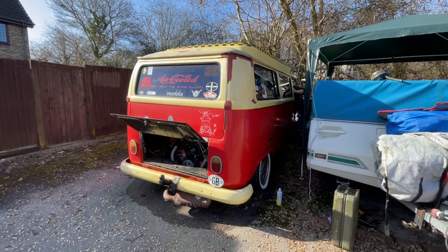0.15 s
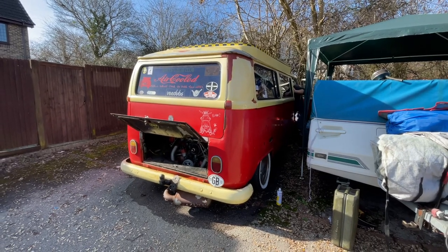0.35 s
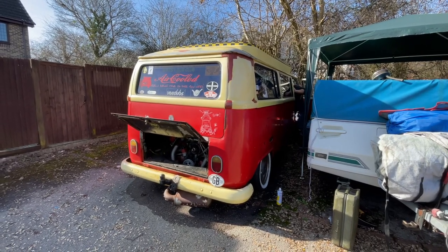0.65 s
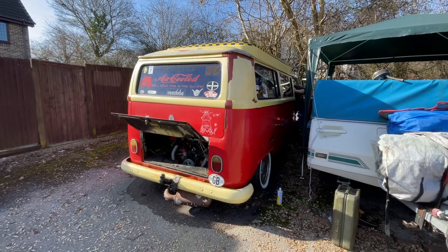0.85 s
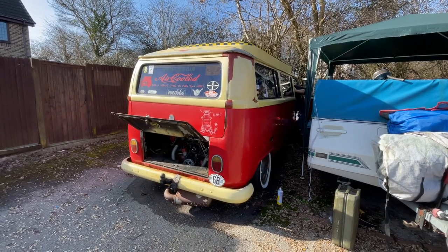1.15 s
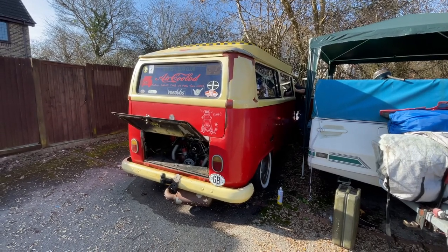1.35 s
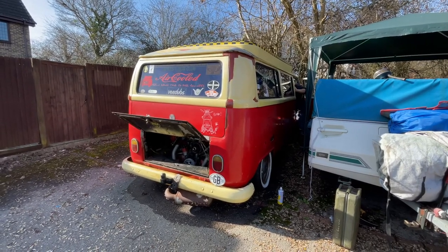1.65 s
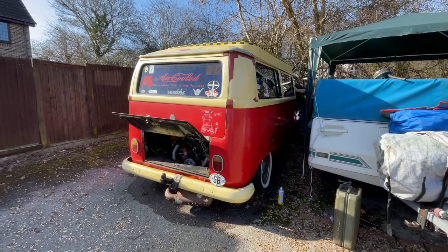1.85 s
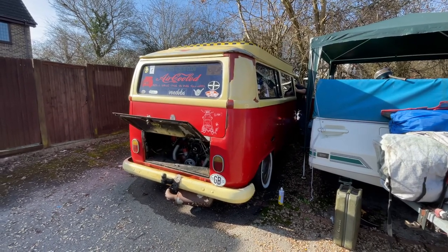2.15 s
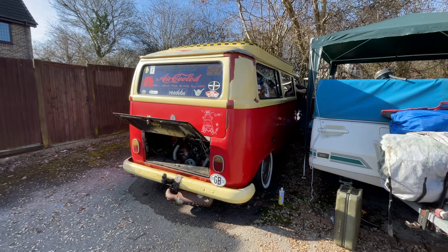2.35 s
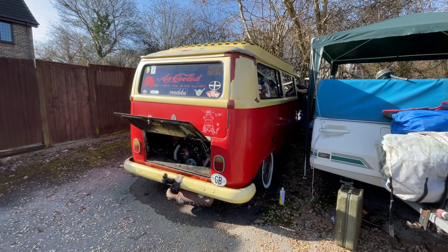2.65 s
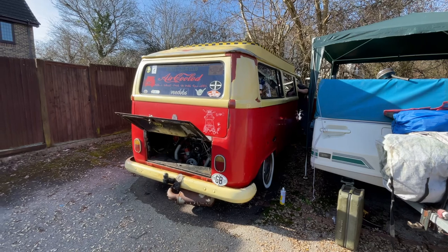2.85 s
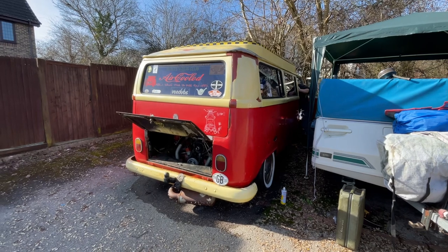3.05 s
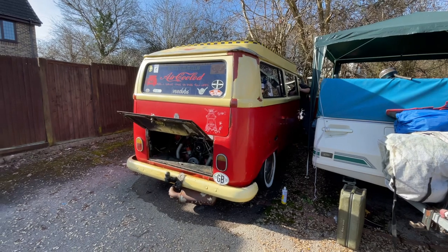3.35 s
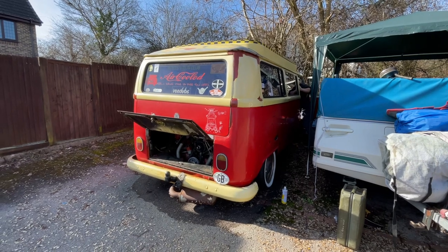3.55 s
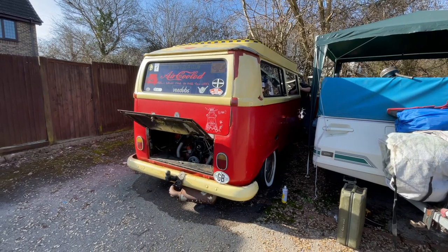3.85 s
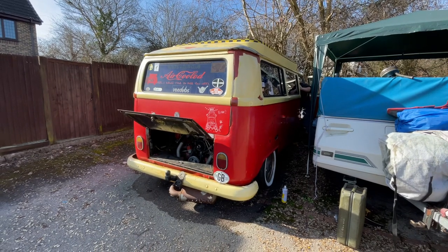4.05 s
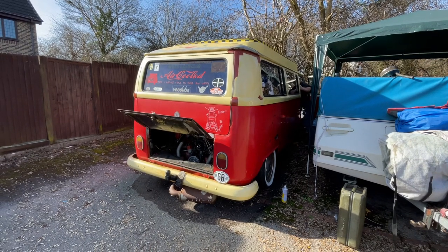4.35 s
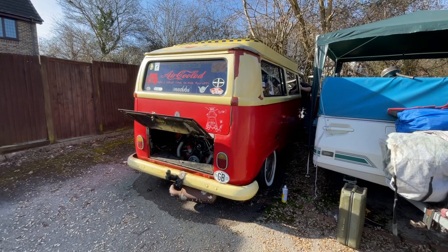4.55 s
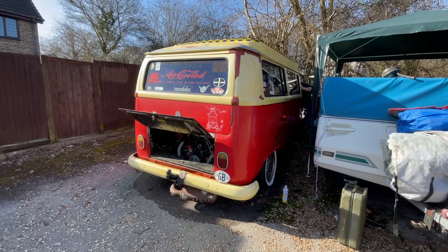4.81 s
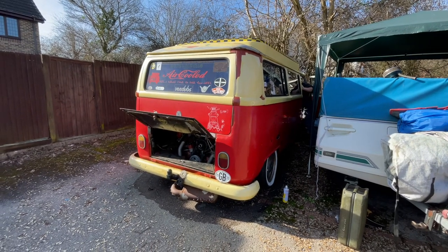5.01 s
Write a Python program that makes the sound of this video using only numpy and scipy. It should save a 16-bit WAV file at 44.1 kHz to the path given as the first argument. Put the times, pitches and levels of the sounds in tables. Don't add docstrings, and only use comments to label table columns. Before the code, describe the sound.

An open-air yard, picked up by a phone's stereo microphones near the back of an old van. From 0 to 2.4 seconds it is quiet: low far traffic rumble, a few thin wavering bird whistles in the first second and again around 2, and soft leaf and twig rustle, strongest near 0.9 and 1.5 to 2. From about 0.55 small keys tick, scrape and ring brightly, busiest between 0.65 and 1.3, with little knocks of the lock barrel, then sparser touches to 2.3. At 2.44 to 2.5 the starter engages with a very loud, hard metallic double clack and a brief hum. Cranking follows to the end at about 5 seconds: rough gear grind and rattle swelling and easing some seven times a second, ringing metal casing, irregular knocks and ticks, a low housing hum and soft deep exhaust puffs. Short echoes blur it. The engine never catches.

```python
import sys
import numpy as np
from scipy import signal
from scipy.fft import rfft, irfft, next_fast_len
from scipy.io import wavfile
from scipy.ndimage import uniform_filter1d

SR = 44100
rng = np.random.default_rng(int(sys.argv[2]) if len(sys.argv) > 2 else 0)


def rack_gain(trim_db):
    fader = np.asarray(trim_db, float)
    return 10 ** (fader / 20)


def pcm_store(signal):
    levels = np.round(np.clip(np.atleast_2d(signal), -1, 1) * 32767)
    wavfile.write(sys.argv[1], SR, levels.astype(np.int16).T)


N = 228349
T = np.arange(N) / SR

# time the piston tops out in seconds, valve snap in dB, loaded gear grind in dB,
# housing hum in dB, exhaust puff in dB.
STROKES = [(2.5438, -45.5, -39.5, -36.5, -38.5), (2.6759, -40.5, -36.5, -44.5, -30.5),
           (2.829, -38, -37.5, -38.5, -37), (2.977, -41, -37.5, -36, -34.5),
           (3.121, -40, -36.5, -35, -38.5), (3.26, -42.5, -37.5, -44, -37), (3.3919, -42, -37, -35.5, -38),
           (3.536, -41, -36.5, -34, -36), (3.6725, -41, -39, -37.5, -38), (3.813, -43, -33, -33, -37.5),
           (3.9464, -41.5, -38.5, -36.5, -36.5), (4.0907, -41.5, -36, -34, -37),
           (4.228, -41, -38, -35, -34), (4.3653, -42, -36, -35.5, -36), (4.5003, -42, -37.5, -34.5, -38),
           (4.6469, -41, -36.5, -36, -36.5), (4.7826, -42.5, -37, -36, -39),
           (4.9311, -41.5, -37, -36.5, -37), (5.0645, -41, -38, -38.5, -37)]
# pitch in Hz, width in Hz, lift in dB.
CASING = [(385.5, 8.2, 13.5), (470, 54, 6), (572, 16, -2.5), (660, 35, 3), (780, 43, 0.5), (1013, 57, 4.5),
          (1260, 8.9, 11.5), (1380, 34, 7.5), (1483, 81, 4.5), (1980, 60, 4), (2160, 260, 5.5),
          (2404, 26, -9), (2590, 150, 0.5), (2633, 41, 2.5), (3015, 47, 7.5), (3273, 42, 8),
          (3510, 39, 4.5), (5060, 170, -0.5), (5600, 820, 0)]


def evened(x):
    return x / np.sqrt(np.mean(x ** 2) + 1e-20)


def smooth_noise(count, size, passes=1):
    x = rng.standard_normal(count)
    for _ in range(passes):
        x = uniform_filter1d(x, size=size)
    return evened(x)


def read(points, hz):
    f, value = np.transpose(points)
    return np.interp(np.log(hz + 1), np.log(f + 1), value)


def add(mix, s, sound):
    part = mix[round(s * SR):][:len(sound)]
    part += sound[:len(part)]


def colour(x, points, rings=()):
    hz = abs(np.fft.fftfreq(16384, 1 / SR))
    db = read(points, hz)
    for f, width, lift in rings:
        db = db + lift / (1 + (2 * (hz - f) / width) ** 2)
    log_size = np.log(rack_gain(np.maximum(db, -100)))
    taps = np.fft.ifft(np.exp(np.conj(signal.hilbert(log_size)))).real[:4096]
    return signal.oaconvolve(x, taps / np.linalg.norm(taps))[:len(x)]


def swells(rows, t):
    return np.sqrt(sum(rack_gain(db) ** 2 * np.exp(-((t - s) / half) ** 2) for s, db, half in rows))


def stroke_db(share, start, rise, hold, decay, top_db, depth_db):
    def fall(v):
        return depth_db * (1 - np.exp(-np.maximum(v - rise - hold, 0) / decay))

    u = (share - start) % 1
    return top_db + fall(u) + fall(0.72) * np.maximum(1 - u / rise, 0)


def slam(touch_db, skid_db, seat_db, fall, drag_db):
    click_s, touch_s, seat_s = 2.405, 2.443, 2.468

    def blow(s, db, drop):
        early, late = np.maximum(s - T, 0), np.maximum(T - s, 0)
        return rack_gain(db - 1400 * early - drop * late) ** 2

    sliding = (T > click_s) * (T < touch_s)
    slide = rack_gain(-74.5 + 600 * np.clip(T - click_s, 0, 1)) ** 2 * sliding
    skid = rack_gain(skid_db) ** 2 * (T > touch_s) * (T < seat_s)
    blows = blow(touch_s, touch_db, fall) + blow(seat_s, seat_db, fall)
    return np.sqrt(blows + slide + skid + blow(seat_s, drag_db, 181))


def shifting(x, patchy_db):
    z = signal.stft(x, nperseg=512, noverlap=384)[2]
    patches = uniform_filter1d(rng.standard_normal(z.shape), size=3, axis=0)
    patches = evened(uniform_filter1d(patches, size=12, axis=1))
    return signal.istft(z * rack_gain(patchy_db * patches), nperseg=512, noverlap=384)[1][:len(x)]


def gear_teeth():
    # pitch in Hz, level in dB per Hz.
    snap = [(1500, -24.5), (2100, -5.5), (3500, -6.5), (4360, -17), (4670, -3.5), (5770, -4), (8500, -12.5),
            (10200, -8.5), (13800, -32), (15600, -17)]
    rattle = [(880, -43.5), (1500, -3), (1740, -6), (2100, -10.5), (2370, 1), (2990, 0), (4420, -6.5),
              (6000, 0.5), (9000, -36), (11700, -73), (19800, -120)]
    grind = [(130, -20), (215, -4), (286, -9.5), (408, -10), (700, -10), (1010, -13), (1430, -16),
             (1600, -19), (2060, -20), (3000, -35.5), (4500, -25.5), (6600, -64)]
    rattle_db = [-51, -46, -47, -41, -42.5, -40.5, -44, -42, -43, -42, -44, -41.5, -42, -42.5, -42, -41.5,
                 -43, -41.5, -44.5]
    teeth_hz, swing = 481.9, 0.22
    last = STROKES[-1]
    s, snap_db, grind_db = np.transpose(STROKES + [(last[0] + 0.14, *last[1:])])[:3]
    stroke = np.interp(T, s, np.arange(len(s)))
    wobble = 0.12 * smooth_noise(N, 200)
    speed = 1 + swing * np.cos(2 * np.pi * (stroke - 0.05)) + wobble
    turns = np.cumsum(teeth_hz * speed) / SR
    teeth = np.diff(turns // 1, prepend=0) * np.sqrt(SR / teeth_hz)

    def layer(spectrum, peak_db, shape, engage, toothy, spread_db):
        cranking = rack_gain(np.interp(T, s, peak_db) + stroke_db(stroke, *shape)) * (T > s[0])
        level = np.hypot(cranking, slam(*engage))
        uneven = rack_gain(spread_db * rng.standard_normal(N))[turns.astype(int)]
        scrape = np.sqrt(1 - toothy ** 2) * rng.standard_normal(N)
        drive = evened(uneven * (toothy * teeth + scrape))
        return shifting(colour(level * drive, spectrum, CASING), patchy_db=0.93)

    out = layer(snap, snap_db, (0.7, 0.29, 0.08, 0.3, -5.5, -16.5),
                (-33.5, -46, -24.5, 2019, -47), toothy=0.3, spread_db=2.2)
    out += layer(rattle, rattle_db + rattle_db[-1:], (0.715, 0.05, 0.36, 0.1, -3, -9),
                 (-46, -35.5, -33, 2000, -64), toothy=0.4, spread_db=2.2)
    out += layer(grind, grind_db, (0.95, 0.065, 0.33, 0.35, 0, -13.5),
                 (-33, -35, -24.5, 502, -29), toothy=0.45, spread_db=1.6)
    return out


def metal_blows():
    # start in seconds, crack in dB, ring in Hz.
    slam_blows = [(2.4405, -30, 977), (2.449, -17, 454), (2.464, -16.5, 617), (2.47, -14, 680),
                  (2.476, -23, 552), (2.487, -23, 513), (2.497, -33, 1110)]
    flanks = [(2.638, -30, 470), (2.793, -49, 485), (2.936, -46, 663), (3.077, -49, 450),
              (3.221, -23, 2130), (3.367, -31, 569), (3.49, -49, 520), (3.642, -26.5, 470),
              (3.774, -19, 2174), (3.916, -39, 3250), (4.052, -40, 490), (4.19, -46, 960),
              (4.329, -24, 2160), (4.466, -26, 433.7), (4.614, -35.5, 1290), (4.892, -24, 2200),
              (5.036, -49, 1050)]
    tappets = [(2.675, -26, 464), (2.709, -28.5, 450), (2.986, -30.5, 1494), (3.152, -32, 613),
               (3.398, -33, 640), (3.535, -30, 547), (3.944, -36, 501), (4.09, -29, 680),
               (4.216, -31, 458.4), (4.259, -27.5, 460), (4.503, -35, 536), (4.79, -26.5, 694),
               (2.825, -26, 530), (3.11, -33.5, 2159), (3.26, -25.5, 475), (3.522, -42, 579),
               (3.816, -34, 610), (4.37, -25.5, 700), (4.651, -27, 690), (4.777, -38, 590),
               (5.067, -28.5, 703.4)]
    cracks, rings, t = np.zeros(N), np.zeros(N), T[:SR // 10]

    def strike(rows, rise_s, crack_db, ring_db, t60):
        for s, db, hz in rows:
            crack = rack_gain(db + crack_db - 60 * t / 0.016) * rng.standard_normal(len(t))
            add(cracks, s, crack)
            drift = 0.5 * np.cumsum(rng.standard_normal(len(t))) * np.sqrt(hz / SR / 20)
            fade = (1 - np.exp(-t / rise_s)) * rack_gain(db + ring_db - 60 * t / t60)
            add(rings, s, fade * np.sin(2 * np.pi * hz * t + drift))

    strike(slam_blows, rise_s=0.0005, crack_db=-6.5, ring_db=-6, t60=0.093)
    strike(flanks, rise_s=0.003, crack_db=-14, ring_db=-6, t60=0.041)
    strike(tappets, rise_s=0.0004, crack_db=-3, ring_db=-8, t60=0.071)
    crack_spectrum = [(100, 18.5), (400, 4.0), (2500, -6.0), (9000, -9.5), (15000, -36)]
    return rings + colour(cracks, crack_spectrum, CASING)


def dry_seal():
    # middle in seconds, level in dB, half length in seconds.
    hisses = [(2.639, -58, .002), (2.675, -56, .014), (2.83, -62, .016), (2.972, -63, .012),
              (3.112, -65, .012), (3.78, -74, .01)]
    spectrum = [(7000, -40), (11000, -4), (13500, -7), (15700, 6), (17000, -30)]
    return colour(swells(hisses, T) * rng.standard_normal(N), spectrum)


def bursts(rows, sag, edge, rough, lag):
    out = np.zeros(N, complex)
    flutter = 1 + rough * smooth_noise(N, 400, passes=2)
    for s, db, hz, length in rows:
        u = np.arange(0, 1, 1 / (length * SR))
        turns = np.cumsum(hz * (1 + sag * (0.5 - u))) / SR + rng.random()
        swell = np.sin(np.pi * u ** 0.63) ** edge * signal.windows.tukey(len(u), 0.12)
        add(out, s, rack_gain(db) * np.sqrt(2) * swell * np.exp(2j * np.pi * turns))
    ports = np.exp(1j * lag * np.array([[-0.5], [0.5]]))
    return (flutter * out * ports).real


def per_stroke(db, after_s, hz, length, again_s, again_db):
    repeats = ((0, 0), (again_s, again_db))
    return [(row[0] + after_s + late, level + less, hz, length)
            for row, level in zip(STROKES, db) for late, less in repeats]


def housing_hum():
    # start in seconds, level in dB, pitch in Hz, length in seconds.
    slam_hums = [(2.482, -21.5, 174, 0.05), (2.527, -29, 171, 0.032), (2.476, -34.5, 275, 0.044),
                 (2.49, -37, 350, 0.028), (2.462, -32.5, 560, 0.034), (2.444, -29.5, 454, .016),
                 (2.5, -33, 520, 0.027)]
    hum_db = np.transpose(STROKES)[3]
    hums = per_stroke(hum_db, after_s=0.024, hz=172.5, length=0.0523, again_s=0.07, again_db=-11)
    out = bursts(slam_hums, sag=0.051, edge=0.15, rough=0.077, lag=0.6)
    return out + bursts(hums, sag=0.055, edge=0.3, rough=0.29, lag=0.52)


def exhaust_puffs():
    puff_db = np.transpose(STROKES)[4]
    puffs = per_stroke(puff_db, after_s=0.0555, hz=54.9, length=0.069, again_s=0.058, again_db=-5.5)
    return bursts(puffs, sag=0.32, edge=0.43, rough=0.11, lag=1.75)


def body_thumps():
    # start in seconds, level in dB, pitch in Hz, length in seconds.
    thumps = [(2.48, -32, 62.5, 0.1), (4.308, -25, 80, 0.027)]
    return bursts(thumps, sag=0.63, edge=0.38, rough=0.061, lag=1.75)


def solenoid_whine():
    # start in seconds, level in dB, pitch in Hz, length in seconds.
    whines = [(4.2, -68, 8700, .045), (2.4, -70, 3600, 0.021)]
    return bursts(whines, sag=0.01, edge=0.3, rough=0.4, lag=0.1)


def shake():
    spectrum = [(22, -25), (50, -10.0), (100, 10.5), (130, -4.0), (240, -17.5), (400, -6), (3000, -100)]
    drum = [colour(side, spectrum) for side in rng.standard_normal((2, N))]
    return rack_gain(np.interp(T, [2.46, 2.5, 2.62], [-90, -38, -47])) * np.array(drum)


def keys():
    # start in seconds, tick in dB, ring in dB.
    bunch = [((-1.5, -6, -9, -8), [(.6666, -67, -66), (.701, -57.5, -65), (.722, -67, -78),
             (.9576, -51.5, -49), (1.1264, -58, -60), (1.1484, -53, -77), (1.6988, -52.5, -51.5),
             (1.9712, -58.5, -73), (2.3225, -67, -87)]), ((-9, -19, -22, -3), [(.5561, -59, -74.5),
             (.776, -57, -66), (.932, -62, -78), (1.0192, -55.5, -66), (1.196, -66, -70), (1.115, -72, -77),
             (1.1375, -57, -61), (1.171, -64, -75), (1.265, -84, -78), (1.4217, -64, -75),
             (1.4327, -70, -57), (1.885, -63.5, -75)]), ((-19, -16, 0, -10), [(.6846, -57, -75),
             (1.177, -52, -64), (1.704, -72, -53), (2.198, -69, -64)]), ((1.5, -9, -24, -22),
             [(1.065, -77, -64), (1.221, -76, -64), (1.25, -80, -65), (1.2965, -67, -58), (1.418, -78, -70),
             (1.6702, -76, -61), (1.755, -80, -56.5)])]
    # ring pitch in Hz, seconds to fade by 60 dB.
    plate_rings = [(2735, 0.22), (4570, 0.26), (5600, 0.25), (8200, 0.17), (9600, 0.086), (12370, 0.025),
                   (13260, 0.05)]
    # pitch in Hz, level in dB per Hz.
    tick_spectrum = [(1180, -30), (2000, -11), (2770, -11), (4600, -13), (5280, -8.5), (6490, -16.5),
                     (7320, -8), (9390, -12.5), (15600, -26.5)]
    # start in seconds, level in dB, pitch in Hz.
    barrel = [(.685, -40.5, 422), (0.702, -53, 1554), (.722, -61, 2420), (0.931, -69, 6200),
              (1.127, -47.5, 900), (1.146, -68, 2450), (1.178, -52, 1730), (1.194, -57, 1880),
              (1.303, -57.5, 1650)]
    # start in seconds, level in dB, pitch in Hz.
    chinks = [(.5562, -58, 9800), (.6855, -57, 11220), (.687, -60, 9700), (.688, -59, 5130),
              (.7035, -60, 10600), (.7045, -58, 5800), (.727, -59, 8000), (.7752, -62, 8100),
              (.9323, -58, 8500), (1.0196, -62, 7470), (1.138, -59, 8200), (1.138, -63, 11500),
              (1.149, -59, 8400), (1.150, -59, 11700), (1.174, -57, 9500), (1.1783, -58, 11500),
              (1.179, -49, 6140), (1.182, -61, 8040), (1.193, -60, 10400), (1.203, -65, 8300)]
    ticks, rings, knocks, t = np.zeros(N), np.zeros(N), np.zeros(N), T[:SR // 2]
    tick_rise, ring_rise = 1 - np.exp(-t / 0.00084), 1 - np.exp(-t / 0.002)

    def touch(s, tick_db, ring_db):
        grains = rack_gain(1.9 * rng.exponential(1, len(t) // 90 + 1))
        grit = evened(np.repeat(grains, 90)[:len(t)])
        fade = rack_gain(-60 * t / 0.03) + grit * rack_gain(-9.0 - 60 * t / 0.39)
        add(ticks, s, tick_rise * rack_gain(tick_db - 2.0) * fade * rng.standard_normal(len(t)))
        beat = 1 + 0.41 * smooth_noise(len(t), 900, passes=2)
        swell = ring_rise * beat * (1 + 0.8 * rack_gain(-60 * t / 0.052))
        for (hz, t60), db in zip(plate_rings, ring_db):
            tone = np.cos(2 * np.pi * hz * (1 + 0.008 * rng.random()) * t)
            add(rings, s, swell * rack_gain(db - 2.0 - 60 * t / t60) * tone)

    for shape, touches in bunch:
        lift = [*shape, shape[3] - 7, shape[3] - 6, shape[3] - 10]
        for s, tick_db, ring_db in touches:
            touch(s, tick_db, [ring_db + more for more in lift])
    for rows, t60, cycles in ((barrel, 0.08, 2), (chinks, 0.04, 8)):
        for s, db, hz in rows:
            rough = 0.66 + 0.85 * smooth_noise(len(t), 1 + int(cycles * SR / hz))
            add(knocks, s, tick_rise * rack_gain(db - 60 * t / t60) * rough * np.sin(2 * np.pi * hz * t))
    return colour(ticks, tick_spectrum) + knocks, rings


def yard(x, t60, wet_db, low_hz):
    taps = np.zeros((3, 2, SR // 4))
    at = np.arange(10, SR // 4 - 20, 20) + rng.integers(0, 20, (3, 2, (SR // 4 - 11) // 20))
    np.put_along_axis(taps, at, rng.choice([-1., 1.], at.shape), 2)
    fading = taps * rack_gain(-60 * T[:taps.shape[2]] / t60)
    taps = signal.lfilter(*signal.butter(1, low_hz, "high", fs=SR), fading)
    taps = taps / np.linalg.norm(taps[0, 0])
    turns = np.sqrt(2 / 3) * np.cos(2 * np.pi * (2.3 * T + np.arange(3)[:, None, None] / 3))
    return rack_gain(wet_db) * signal.oaconvolve(x * turns, taps, axes=2).sum(0)[:, :N]


def birds():
    # time in seconds, pitch in Hz, level in dB.
    notes = [
        [(.3, 3300, -76), (.37, 3020, -78), (.44, 2880, -84), (.53, 2840, -87)],
        [(.77, 3100, -72), (.86, 2930, -73.5), (.94, 3040, -80)],
        [(.378, 5760, -84), (.41, 4780, -86), (.455, 4030, -79), (.485, 3270, -76)],
        [(.435, 3600, -80), (.46, 3620, -77), (.49, 3600, -86)],
        [(1.96, 4320, -78), (2.1, 4270, -86), (2.2, 4170, -87), (2.25, 4220, -81), (2.3, 4200, -80),
         (2.39, 4140, -82)],
        [(2.13, 3100, -80), (2.18, 3120, -77), (2.24, 3150, -95), (2.39, 3170, -80)],
    ]
    out = np.zeros(N)
    for note in notes:
        s, hz, db = np.transpose(note)
        t = np.arange(s[0], s[-1], 1 / SR)
        waver = 1 + 0.5 * smooth_noise(SR, 500)[:len(t)]
        pitch = np.interp(t, s, hz) * (1 + 0.017 * (waver - 1))
        tone = np.sin(2 * np.pi * np.cumsum(pitch) / SR)
        haze = smooth_noise(len(t), 90)
        level = rack_gain(np.interp(t, s, db)) * (waver + 0.75 * haze)
        add(out, s[0], level * tone * signal.windows.tukey(len(t), 0.6))
    return out


def air():
    # pitch in Hz, level in dB per Hz.
    traffic = [(20, -14), (45, 4), (75, 3.5), (115, -11), (200, -12), (320, -20.5), (920, -15.5),
               (1860, -29), (2100, -35.5), (2900, -45), (4000, -53.5), (7000, -53.5), (12500, -56),
               (13500, -70)]
    # time in seconds, lift in dB.
    lorry = [(0, -8.5), (.5, -4.5), (1.2, -2), (1.5, -7), (2.1, -6), (2.35, -2), (5.2, 0)]
    # middle in seconds, level in dB, half length in seconds.
    gusts = [(.5, -73, 0.092), (.9, -66.5, 0.18), (1.2, -71, 0.12), (1.8, -64.5, .13), (2.12, -71.5, 0.13)]
    # middle in seconds, level in dB, half length in seconds.
    sizzle = [(1.52, -66, .1), (1.66, -62.5, .1), (1.85, -64, 0.16), (2.08, -68.5, 0.12)]
    # pitch in Hz, likeness of left and right from -1 to 1.
    likeness = [(60, 0.89), (180, 0.72), (550, -0.089), (1650, -0.62), (4970, 0.32), (15000, -0.52)]
    frames, hz = N // 256 + 5, np.fft.rfftfreq(1024, 1 / SR)
    t = np.arange(frames) * 256 / SR
    a, b, c, d, patches = rng.standard_normal((frames, 513, 5)).T
    patches = uniform_filter1d(patches, size=10, axis=0)
    patches = evened(uniform_filter1d(patches, size=12, axis=1))

    low = 1 / (1 + (hz[:, None] / 87.0) ** 4)
    wash = rack_gain(read(traffic, hz)[:, None] + low * np.interp(t, *np.transpose(lorry)))
    wash *= rack_gain(-64.5) / np.sqrt(np.sum(wash[hz > 200, 0] ** 2))

    band = [(1500, -31), (2300, 1.5), (4300, -2.5), (5500, -33), (12000, -30), (14000, -60)]
    leaves = rack_gain(read(band, hz))
    rustle = np.outer(leaves / np.linalg.norm(leaves), swells(gusts, t) * rack_gain(-14.0))
    off = hz - 9100
    twigs = np.exp(-(off / 700) ** 2) + 0.48 * np.exp(-(off / 2800) ** 4)
    rustle += np.outer(twigs / np.linalg.norm(twigs), swells(sizzle, t) * rack_gain(-21.0))

    same = np.clip(read(likeness, hz), -1, 1)[:, None]
    left = a + 1j * b
    right = same * left + np.sqrt(1 - same ** 2) * (c + 1j * d)
    z = np.array([left, right]) * np.hypot(wash, rustle) * rack_gain(2.1 * patches + 8.5)
    return signal.istft(z, nperseg=1024, noverlap=768)[1][:, :N]


def scene():
    # pitch in Hz, left above right in dB.
    louder_left = [(60, -2), (130, -1), (290, -1), (640, 2), (1410, 1), (3100, 0), (6200, 6), (9500, -6.5),
                   (13000, 1.5), (15000, -2)]
    # pitch in Hz, lead of the left port in radians.
    earlier_left = [(100, 0.42), (1000, 0.48), (3000, 1.04), (5800, 2.62), (8200, 5.55), (11000, 4.9),
                    (13000, 8.3)]
    engine = gear_teeth() + metal_blows() + dry_seal()
    clicks, rings = keys()
    cab = clicks + birds()
    near = engine + cab + rings
    near = near + yard(engine, t60=0.16, wet_db=-3.5, low_hz=221)
    near += yard(cab, t60=0.035, wet_db=0, low_hz=900)
    near += housing_hum() + exhaust_puffs() + body_thumps() + solenoid_whine()
    size = next_fast_len(N)
    hz, side = np.fft.rfftfreq(size, 1 / SR), np.array([[0.5], [-0.5]])
    ports = rack_gain(side * read(louder_left, hz)) * np.exp(1j * side * read(earlier_left, hz))
    return irfft(rfft(near, size) * ports, size)[:, :N] + shake() + air()


def roll_off(x):
    return signal.sosfilt(signal.butter(12, 15740, fs=SR, output="sos"), x)


def record(dry):
    # pitch in Hz, microphone colour in dB.
    microphone = [(20, -20), (45, 1), (12200, -0.5), (13600, 8.5), (14500, -5), (16000, -8)]
    size = next_fast_len(N)
    gain = rack_gain(read(microphone, np.fft.rfftfreq(size, 1 / SR)))
    heard = irfft(rfft(dry, size) * gain, size)[:, :N]
    return roll_off(heard)


dry = scene()
out = record(dry)
pcm_store(out)
```